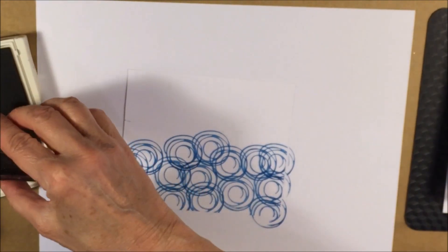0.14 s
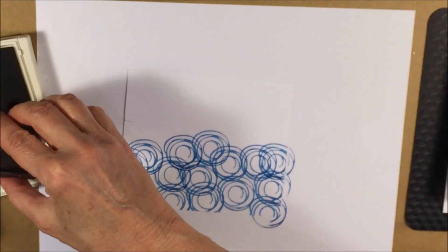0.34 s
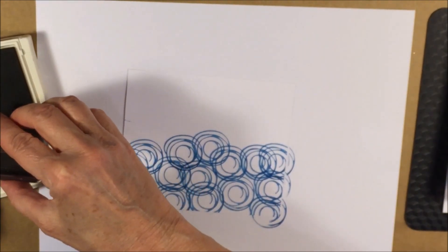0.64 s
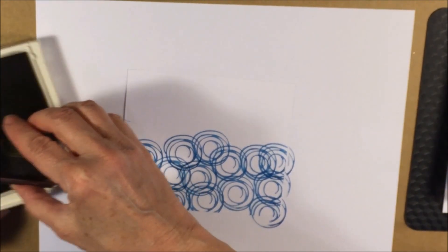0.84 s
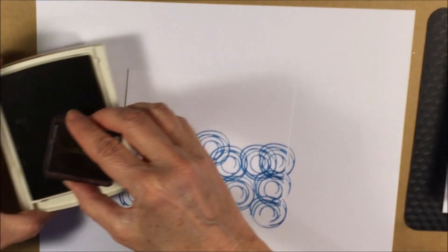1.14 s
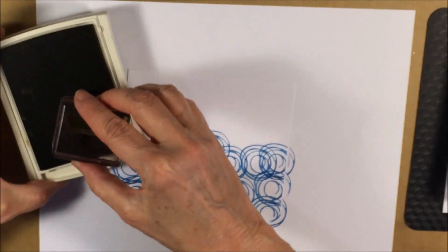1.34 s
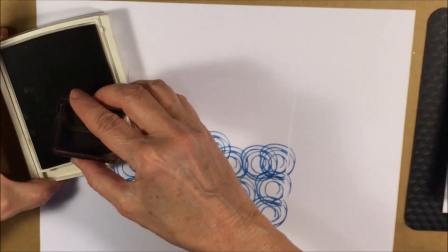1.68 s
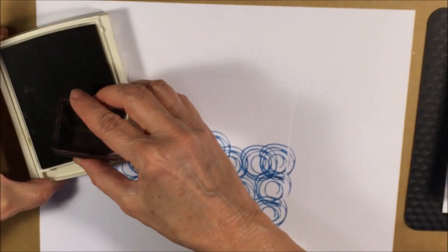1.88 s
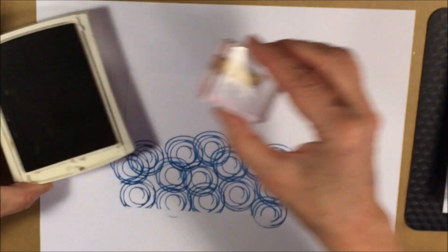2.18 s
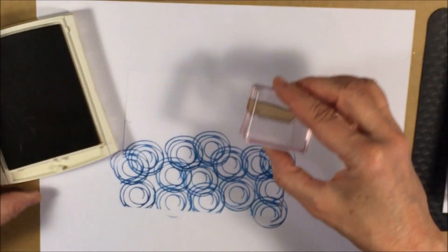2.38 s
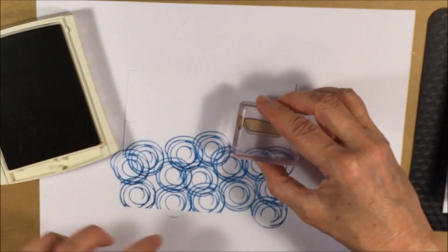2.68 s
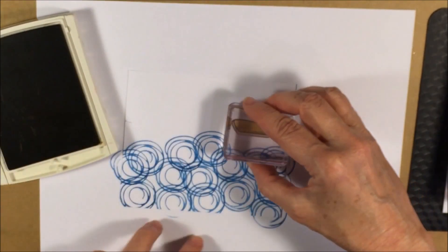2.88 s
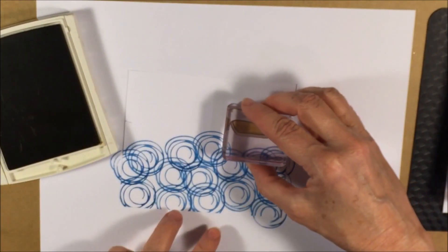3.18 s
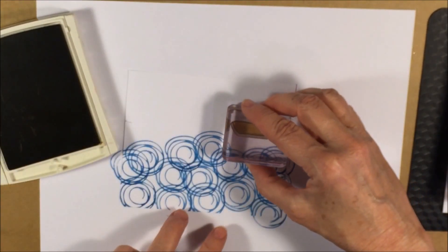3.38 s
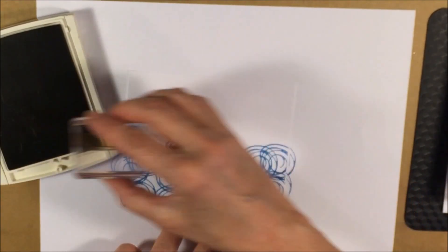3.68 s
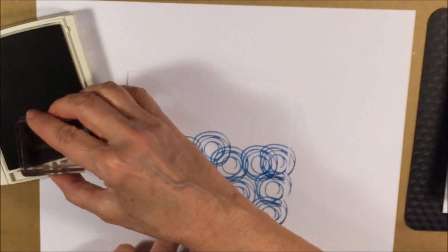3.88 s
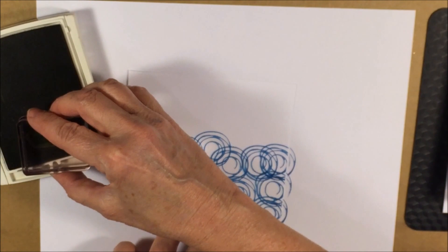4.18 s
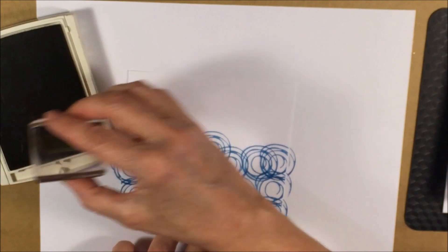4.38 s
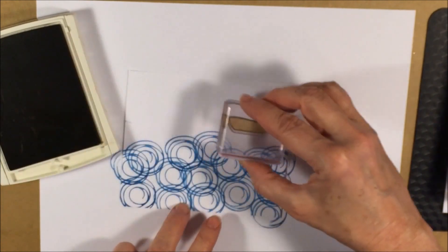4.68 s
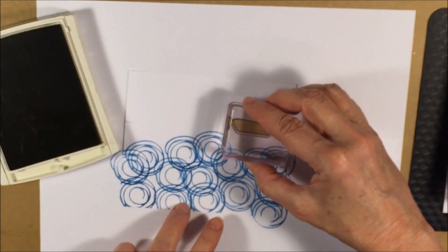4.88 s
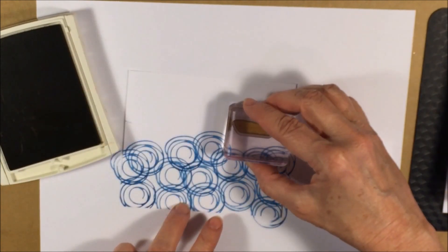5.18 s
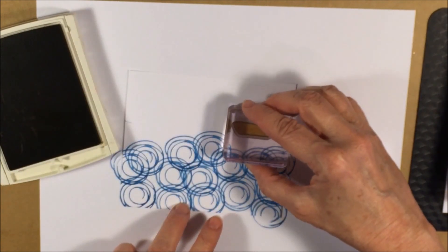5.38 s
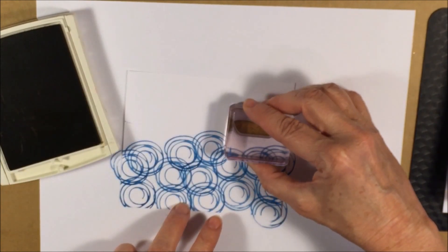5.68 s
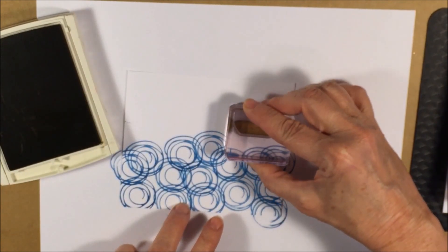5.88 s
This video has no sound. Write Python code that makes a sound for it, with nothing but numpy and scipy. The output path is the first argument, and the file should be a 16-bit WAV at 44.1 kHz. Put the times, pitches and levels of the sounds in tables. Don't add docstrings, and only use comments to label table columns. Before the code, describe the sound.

Close up at a craft table in a small quiet room, a hard acrylic block dabs an ink pad in a hollow plastic tray. After a soft scuff on paper come five brisk knocks, a short pause, then a tighter cluster of heavier taps with clicks and rattles. It goes quiet except for one faint low thump and a small lift-off rattle, over mild microphone hiss and a distant low hum.

```python
import sys
import numpy as np
from scipy import signal
from scipy.fft import rfft, irfft
from scipy.io import wavfile
from scipy.ndimage import uniform_filter1d

SR = 44100
rng = np.random.default_rng(int(sys.argv[2]) if len(sys.argv) > 2 else 0)


def wav_record(signal):
    frames = np.transpose(np.atleast_2d(signal))
    bounded = np.clip(frames, -1, 1)
    quanta = np.round(bounded * 32767).astype(np.int16)
    wavfile.write(sys.argv[1], SR, quanta)


def voltage_ratio(decibels):
    exponent = np.asarray(decibels, float) / 20
    return 10 ** exponent


N = 266143

# frequency in Hz, density in dB per Hz.
HISS = [(50, -36), (85, -2.5), (171, -8), (417, -12.5), (703, -16.5), (1140, -16.5), (2090, -17),
        (15500, -26.5)]
# time in seconds, level in dB rms.
HUM_LOAD = [(0.0, -53.5), (0.1, -54), (0.28, -63.5), (0.32, -56), (1.07, -55.5), (1.26, -63), (1.31, -56),
            (3.19, -55.5), (3.27, -61.5), (3.78, -54), (3.81, -65), (3.88, -56), (4.7, -57.5), (4.84, -52),
            (5.02, -73), (5.12, -56.5), (5.91, -57), (6.03, -62)]
# multiple of the hum pitch, level in dB.
HUM_OVERTONES = [(2, -21.5), (3, -27.5)]
# time in seconds, level in dB.
SLIDE = [(0.0, -93), (0.052, -78), (0.084, -85), (0.124, -77.5), (0.226, -77), (0.274, -85.5), (0.31, -84)]
# centre in Hz, width in Hz, level in dB.
SLIDE_BANDS = [(1530, 120, -0.5), (1850, 310, -1.5), (3050, 3700, 0.5), (5540, 990, -3.5), (9000, 7100, -2)]
# start in seconds, peak in dB, centre in Hz, t60 in seconds.
TICKS = [(0.523, -52.5, 3333, 0.023), (0.679, -48, 3600, .03), (0.821, -59, 3240, 0.032),
         (0.833, -41, 3148, 0.016), (0.933, -57, 2400, 0.022), (0.985, -56.5, 6640, 0.14),
         (1.023, -36, 7300, .014), (1.027, -49.5, 8000, .14), (1.564, -43.5, 4520, 0.033),
         (1.567, -52, 8200, 0.062), (1.602, -56, 7940, 0.11), (1.604, -40.5, 2260, 0.09),
         (1.6085, -33, 4930, 0.005), (2.118, -59, 3480, .045), (2.387, -44.5, 6970, .011),
         (2.396, -43, 3194, .025), (2.456, -51, 9000, .013), (2.456, -48, 3620, 0.017),
         (4.035, -65, 2510, .055), (4.421, -63, 4040, .1), (4.425, -53, 8450, .023)]
# level in dB relative to the knock, centre in Hz, t60 in seconds.
EDGE_CLICKS = [(-19.5, 3000, 0.017), (-27.5, 8800, 0.0063)]
# start in seconds, peak in dB, pitch in Hz.
ROCKS = [(0.356, -43, 1130), (0.392, -57, 1180), (0.415, -48.5, 1170), (0.572, -45, 1100),
         (0.613, -47.5, 1050), (0.742, -43.5, 965), (0.915, -42, 1064), (0.932, -41, 1200),
         (1.073, -50.5, 970), (1.098, -58.5, 980), (1.563, -48.5, 1280), (1.61, -41, 910),
         (1.666, -46, 1130), (1.813, -38.5, 1180), (1.837, -43, 1000), (1.957, -42.5, 1180),
         (1.974, -54, 1160), (2.085, -51, 970), (2.118, -47.5, 1160), (2.128, -43.5, 1130),
         (2.22, -59.5, 1460), (2.401, -34, 1190), (2.43, -47, 1180), (2.457, -49.5, 980),
         (4.413, -53, 1220), (4.427, -43, 1160), (4.438, -48.5, 1240)]
# start in seconds, knock peak in dB, knock pitch in Hz,
# tray floor level in dB, table thump level in dB.
DABS = [
    (0.3491, -30.5, 1250, -45.5, -75),
    (0.5217, -24.5, 1330, -39.5, -47.5),
    (0.678, -29.5, 1320, -44, -51),
    (0.833, -25, 1370, -40, -38.5),
    (1.024, -27.5, 1486, -48, -43),
    (1.8992, -27, 1366, -37.5, -39),
    (2.3953, -24, 1370, -53, -51),
]
PRESSES = [
    (1.6029, -28, 1520, -35.5, -35.5),
    (1.7544, -22, 1360, -30.5, -40.5),
    (2.0322, -28, 1410, -33, -41),
    (4.0531, -51, 1030, -43, -34),
]
# frequency in Hz, level in dB, t60 in seconds.
TRAY = [(660, -24, .03), (815, -24, .03), (922, -11, .1), (1045, -19, .05), (1160, -13, .07),
        (1380, -21, .035), (1455, -17, .05), (1570, -19, .04), (1795, -17, .03), (2445, -18, .04),
        (2620, -22, .03), (2800, -23, .02), (3430, -20, .018), (4320, -27, .015)]
# frequency in Hz, level in dB, t60 in seconds.
TRAY_FLOOR = [(387, 0, .055), (300, -12, .05), (520, -9, .03)]
# frequency in Hz, level in dB, t60 in seconds.
TABLE = [(85, -12, .13), (134, -3, .12), (190, -4, .11), (243, -9, .11), (283, -12, .09)]
# start in seconds, level in dB.
LIFT_THUMP = (4.431, -46)
# frequency in Hz, density in dB per Hz.
CLATTER = [(300, -27), (600, -19), (950, 5.5), (1600, -1), (2200, -1), (3500, -8), (5000, -22),
           (9000, -34.5)]
# band centre in Hz, t60 in seconds, level in dB.
ROOM = [(200, .25, -39), (500, .2, -35), (1200, .2, -35), (2500, .2, -27), (5000, .18, -22),
        (11000, .15, -20)]
# centre in Hz, width in Hz, depth in dB.
PORT_DIPS = [(4960, 280, -2), (7700, 420, -1.5), (10560, 910, -4.5)]
DROPOUTS = [(0.668, 1, 1900), (1.861, 1, 3000), (2.074, 1, 2800), (2.649, 1, 1500), (3.034, 1, 1800),
            (3.248, 1, 900), (3.598, 2, 1500), (3.822, 1, 1700), (4.250, 1, 900), (4.633, 1, 1500),
            (4.697, 1, 1900), (4.997, 1, 900), (5.248, 1, 2500), (5.444, 1, 900), (5.999, 1, 1200)]

DAB_MS, PRESS_MS = .8, 2.1
# its row, then its contact time in milliseconds.
TAPS = [row + (DAB_MS,) for row in DABS] + [row + (PRESS_MS,) for row in PRESSES]


def rms_one(x):
    return x / np.sqrt(np.mean(x ** 2) + 1e-20)


def add(track, s, sound):
    i = round(s * SR)
    track[i:i + len(sound)] += sound[:N - i]


def ring(force, hz, t60):
    r = voltage_ratio(-60 / (t60 * SR))
    w = 2 * np.pi * hz / SR
    return signal.lfilter([0, np.sin(w)], [1, -2 * r * np.cos(w), r * r], force + 1e-18)


def width_t60(width_hz):
    return np.log(1000) / np.pi / width_hz


def push(ms):
    force = np.hanning(int(ms * SR / 1000) + 3)
    return np.pad(force / force.sum(), (0, SR // 3))[:SR // 3]


def struck(force, modes, luck, scatter_db):
    out = 0
    for (hz, level_db, t60), (luck_db, luck_hz) in zip(modes, luck):
        strength = voltage_ratio(level_db + scatter_db * luck_db)
        out = out + strength * ring(force, hz * (1 + .007 * luck_hz), t60)
    return out


def coloured(spectrum, size):
    hz = np.maximum(np.fft.rfftfreq(size, 1 / SR), 1)
    points = np.array(spectrum)
    shape_db = np.interp(np.log(hz), np.log(points[:, 0]), points[:, 1], left=-90)
    return rms_one(irfft(rfft(rng.standard_normal(size)) * voltage_ratio(shape_db), size))


def drift(rate):
    r = np.exp(-2 * np.pi * rate / SR)
    slow = signal.lfilter([1], [1, -2 * r, r * r], rng.standard_normal(N + SR))[SR:]
    return rms_one(slow - slow.mean())


def hiss():
    return voltage_ratio(-70.5) * coloured(HISS, size=N)


def hum():
    hum_hz, wander_hz, flutter_db, flutter_per_s = 57.7, 1.1, 2.5, 5
    rumble_hz, rumble_width_hz, rumble_db = 58, 22, -64
    s, level_db = np.transpose(HUM_LOAD)
    phase = 2 * np.pi * np.cumsum(hum_hz + wander_hz * drift(flutter_per_s)) / SR
    load_db = np.interp(np.arange(N) / SR, s, level_db) + flutter_db * drift(flutter_per_s)
    line = np.sqrt(2) * voltage_ratio(load_db) * np.sin(phase)
    for multiple, rel_db in HUM_OVERTONES:
        line += np.sqrt(2) * voltage_ratio(np.median(level_db) + rel_db) * np.sin(round(multiple) * phase)
    bed = ring(rng.standard_normal(N), rumble_hz, width_t60(rumble_width_hz))
    return line + voltage_ratio(rumble_db) * rms_one(bed)


def slide():
    size = SR // 2
    grit = rng.standard_normal(size)
    grit *= voltage_ratio(2.0 * uniform_filter1d(rng.standard_normal(size), size=400) * 20)
    sound = 0
    for hz, width_hz, rel_db in SLIDE_BANDS:
        sound = sound + voltage_ratio(rel_db) * rms_one(ring(grit, hz, width_t60(width_hz)))
    s, level_db = np.transpose(SLIDE)
    out = np.zeros(N)
    add(out, 0, sound * voltage_ratio(np.interp(np.arange(size) / SR, s, level_db, right=-130)))
    return out


def ticks():
    rows = [(tap[0], tap[1] + rel_db, hz, t60) for tap in TAPS for rel_db, hz, t60 in EDGE_CLICKS] + TICKS
    out, grit = np.zeros(N), rng.standard_normal((len(rows), 4000))
    t = np.arange(4000) / SR
    for (at, level_db, hz, t60), noise in zip(rows, grit):
        snap = noise * voltage_ratio(-60 * t / t60) * (1 - np.exp(-t / .0007))
        band = signal.butter(2, [hz / 1.5, min(hz * 1.45, .45 * SR)], "band", fs=SR, output="sos")
        snap = signal.sosfilt(band, snap)
        add(out, at - .0005, voltage_ratio(level_db) * snap / np.abs(snap).max())
    return out


def rocks():
    bounce_s, bounce_db, bounce_hz = .027, -25.5, 980
    settle_s, settle_loss_db = .018, 10
    rock_ms = 5.4
    drops = [(tap[0] + bounce_s, tap[1] + bounce_db, bounce_hz) for tap in TAPS] + ROCKS
    rows = []
    for at, level_db, hz in drops:
        for k in range(2):
            later = settle_s * k * rng.uniform(.7, 1.3)
            rows.append((at + later, level_db - settle_loss_db * k, hz * rng.uniform(.97, 1.03)))
    out, grit = np.zeros(N), rng.standard_normal((len(rows), 2000))
    u = np.arange(2000) / SR / (rock_ms / 1000)
    for (at, level_db, hz), noise in zip(rows, grit):
        contacts = uniform_filter1d(noise * np.abs(noise), size=15) * u * np.exp(-u ** 2)
        sound = ring(contacts, hz, .018) - .6 * ring(contacts, hz * 1.3, .009)
        sound += 0.02 * ring(contacts, 490.0, 0.028)
        sound += 0.33 * ring(contacts, 2300.0, 0.0051)
        add(out, at - .002, voltage_ratio(level_db) * sound / np.abs(sound).max())
    return out


def taps():
    ring_db = -2
    clatter_db, first_touch_s = -22, 0.001512
    out, t = np.zeros(N), np.arange(SR // 3) / SR
    chance = rng.standard_normal((len(TAPS) + 1, 3, 16, 2))
    grit = rng.standard_normal((len(TAPS), len(t)))
    for (at, knock_db, hz, floor_db, thump_db, contact_ms), luck, noise in zip(TAPS, chance, grit):
        top = 1.2 * contact_ms / 1000
        u = t / top
        if contact_ms > 1.5:
            swell = 1.4 * u * np.exp(-u ** 3 / 3)
        else:
            swell = 1.65 * u * np.exp(-u ** 2 / 2)
        glide = hz * (t - top) * (.9 + .1 * u)
        add(out, at - top / 6, -voltage_ratio(knock_db - 1) * swell * np.cos(2 * np.pi * glide))

        rough = swell * noise ** 3
        rough = uniform_filter1d(rough / np.sqrt(np.sum(rough ** 2)), size=4)
        add(out, at, voltage_ratio(knock_db + ring_db) * struck(rough, TRAY, luck[0], scatter_db=2.5))

        t60 = max(.095 + .005 * (knock_db + 26), .05)
        lumps = voltage_ratio(.33 * uniform_filter1d(noise, size=150) * 150)
        clatter = coloured(CLATTER, size=len(t)) * lumps * voltage_ratio(-60 * t / t60) * np.minimum(u, 1)
        held_back_db = 0.04 * max(knock_db + 29.5, 0)
        add(out, at - first_touch_s, voltage_ratio(knock_db - held_back_db + clatter_db) * clatter)

        add(out, at + .001, voltage_ratio(floor_db) * struck(push(.8), TRAY_FLOOR, luck[1], scatter_db=1.5))
        add(out, at + .0055, -voltage_ratio(thump_db) * struck(push(2.2), TABLE, luck[2], scatter_db=1.5))
    lift_s, lift_db = LIFT_THUMP
    spring_back = struck(push(3.1), TABLE + TRAY_FLOOR[:1], chance[-1, 0], scatter_db=2.5)
    add(out, lift_s, voltage_ratio(lift_db) * spring_back)
    return out


def room(dry):
    t, tail = np.arange(SR // 2) / SR, 0
    for hz, t60, level_db in ROOM:
        sos = signal.butter(2, [hz / 1.5, hz * 1.5], "band", fs=SR, output="sos")
        band = signal.sosfilt(sos, rng.standard_normal(len(t)))
        band = band * voltage_ratio(-60 * t / t60) * np.clip(t / 0.00273, 0, 1)
        tail = tail + voltage_ratio(level_db) * band / np.sqrt(np.sum(band ** 2) * 3 * hz / SR)
    return signal.fftconvolve(dry, tail)[:N]


def scene():
    hits = taps() + rocks() + ticks()
    return (hits + room(hits) + slide() + hum() + hiss())[None]


def dropouts(x):
    frame_ms, lost_share = 16.5, .89
    out = x.copy()
    for at, frames, edge_hz in DROPOUTS:
        size = int(frames * frame_ms * SR / 1000) + 300
        i = round(at * SR) - size // 2
        lines = rfft(x[i:i + size] * signal.windows.tukey(size, .7))
        above = np.fft.rfftfreq(size, 1 / SR) > edge_hz
        height = np.abs(lines) * above
        lost = above & (height < .62 * height.max())
        out[i:i + size] -= lost_share * irfft(lines * lost, size)
    return out


def low_pass(x):
    return signal.sosfilt(signal.butter(12, 16480, fs=SR, output="sos"), x)


def record(dry):
    hz = np.fft.rfftfreq(N, 1 / SR)
    dips_db = 0
    for centre_hz, width_hz, dip_db in PORT_DIPS:
        dips_db = dips_db + dip_db * np.exp(-((hz - centre_hz) / width_hz) ** 2 * 2)
    x = irfft(rfft(dry[0]) * voltage_ratio(dips_db) * (hz < 15800), N)
    x = signal.sosfilt(signal.butter(4, 37.0, "high", fs=SR, output="sos"), x)
    mix = dropouts(x)[None]
    return low_pass(mix)


dry = scene()
out = record(dry)
wav_record(out)
```